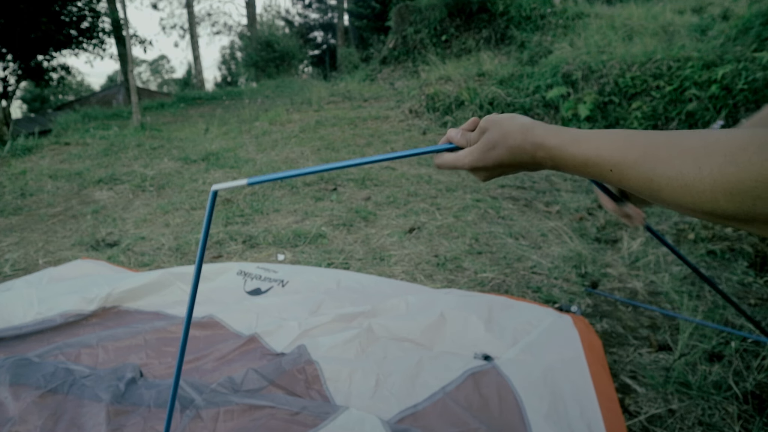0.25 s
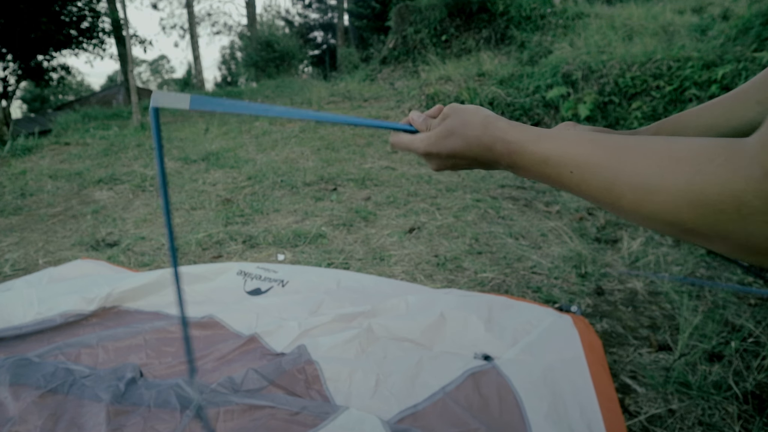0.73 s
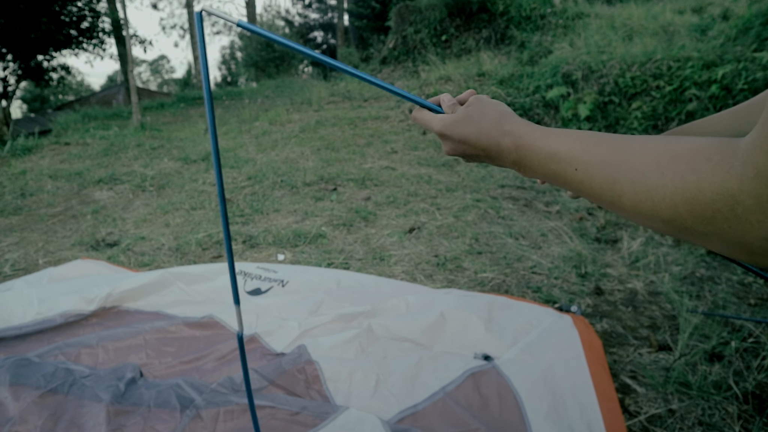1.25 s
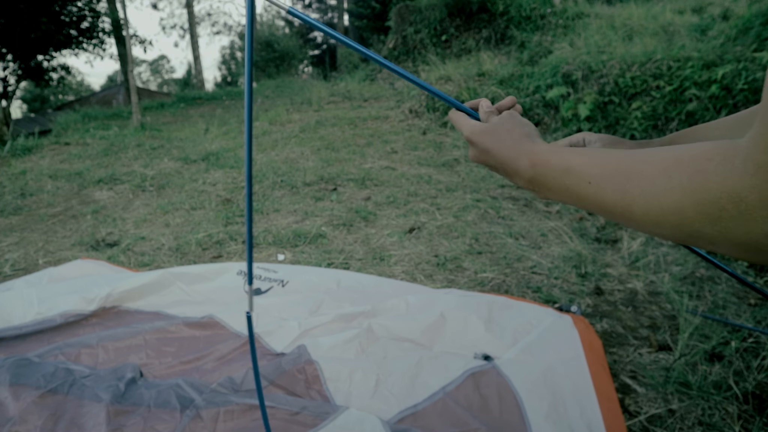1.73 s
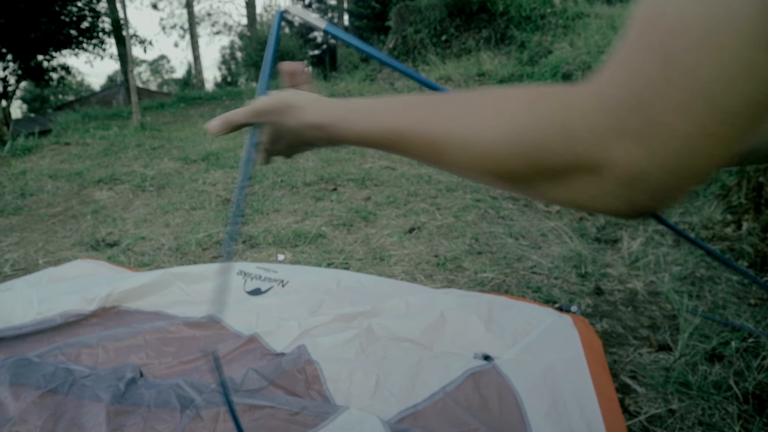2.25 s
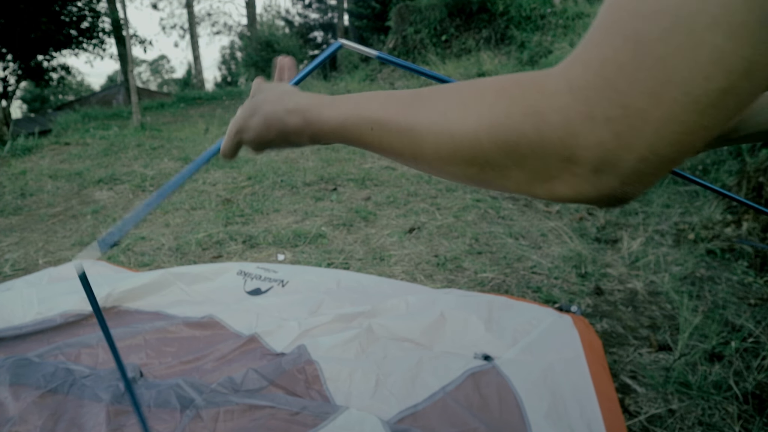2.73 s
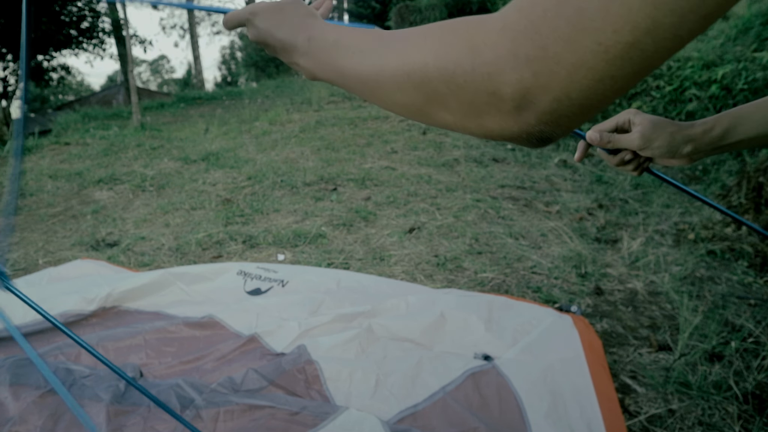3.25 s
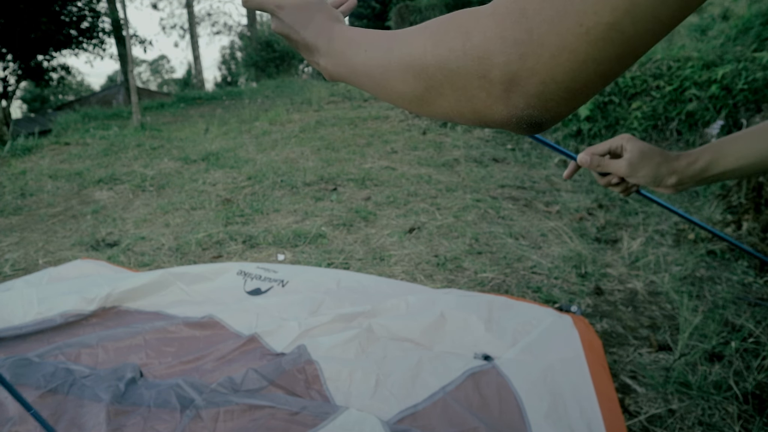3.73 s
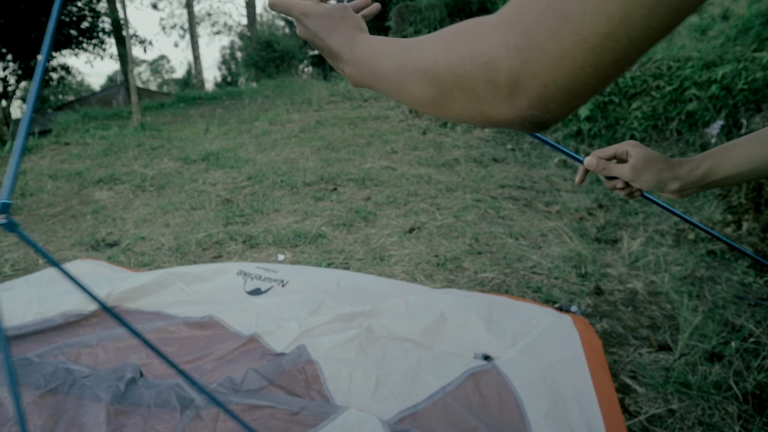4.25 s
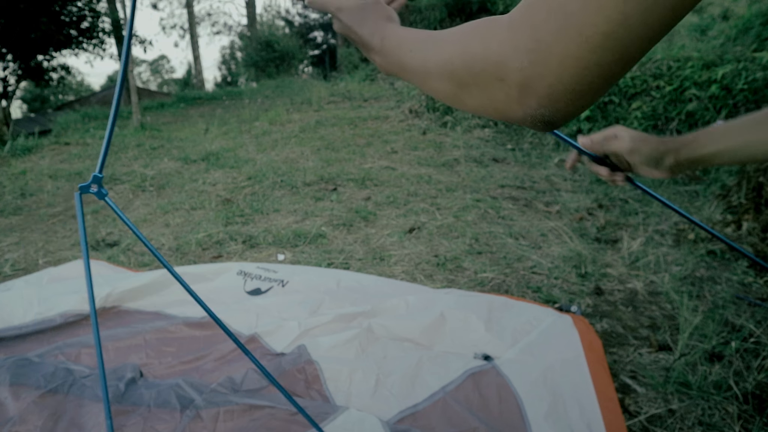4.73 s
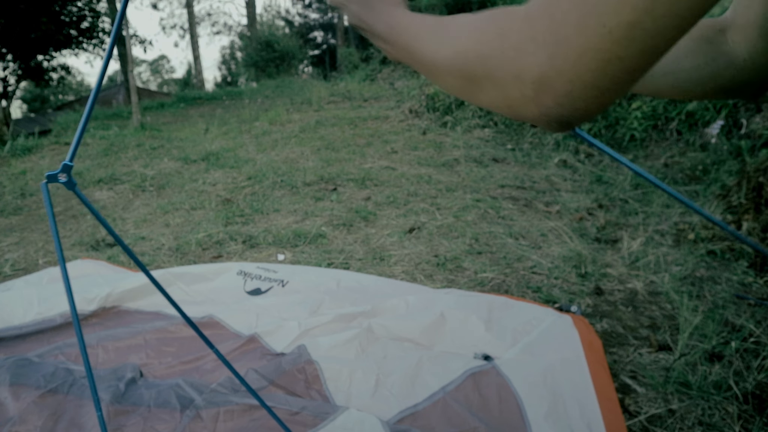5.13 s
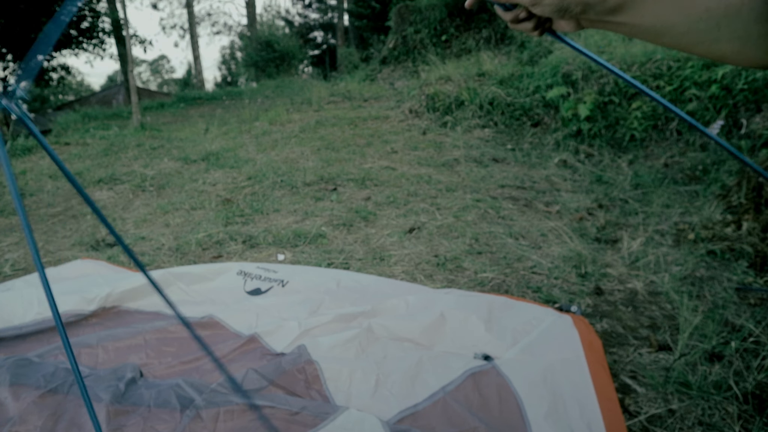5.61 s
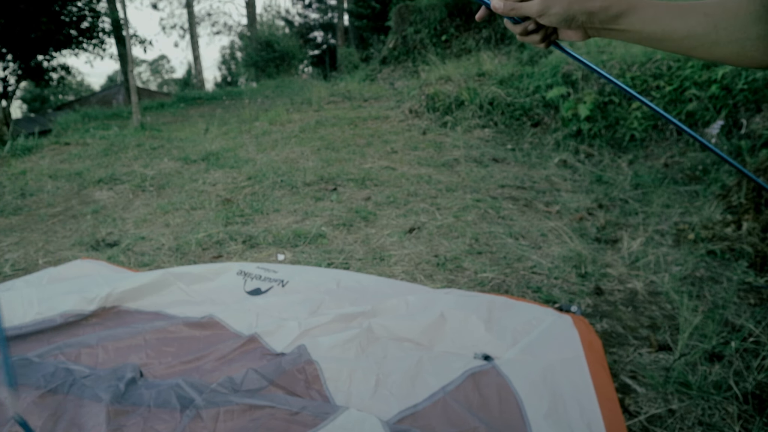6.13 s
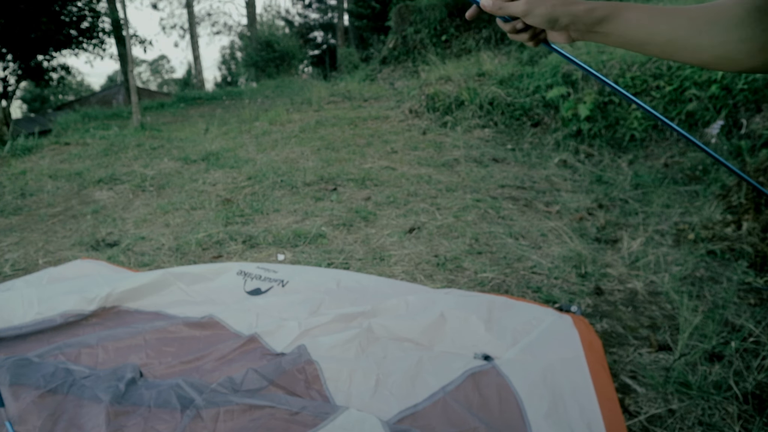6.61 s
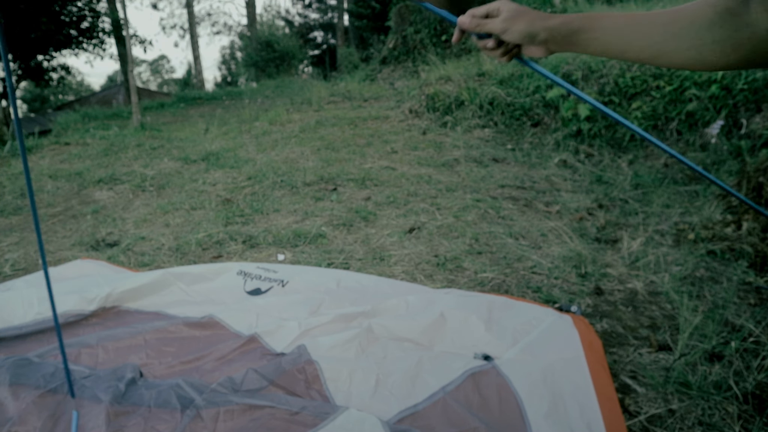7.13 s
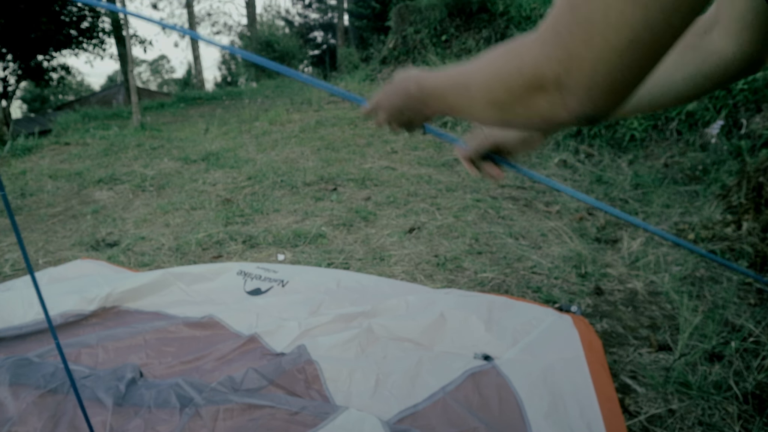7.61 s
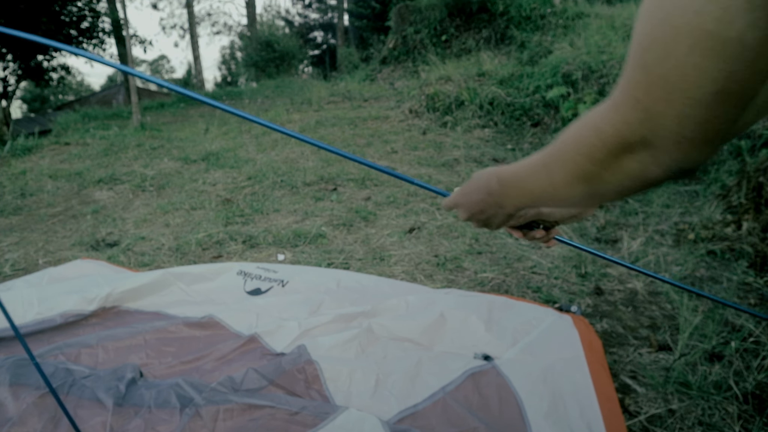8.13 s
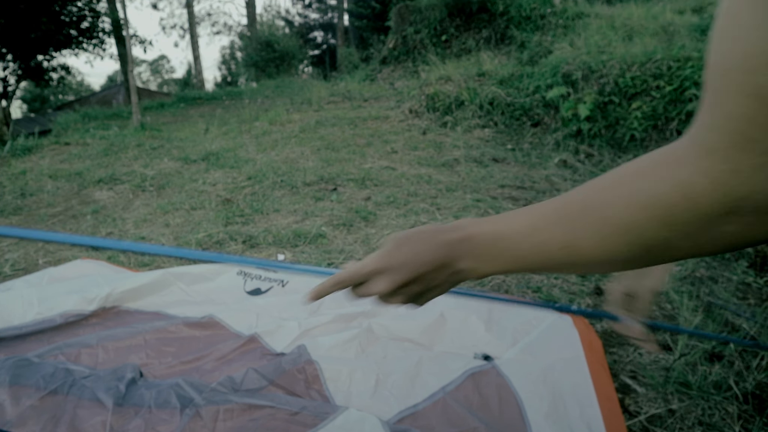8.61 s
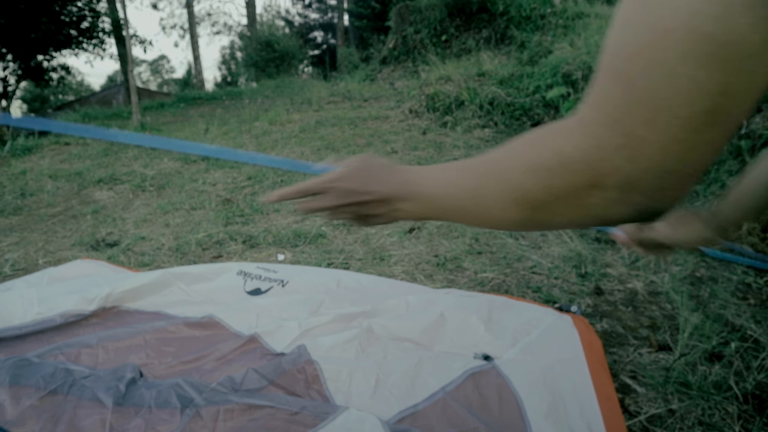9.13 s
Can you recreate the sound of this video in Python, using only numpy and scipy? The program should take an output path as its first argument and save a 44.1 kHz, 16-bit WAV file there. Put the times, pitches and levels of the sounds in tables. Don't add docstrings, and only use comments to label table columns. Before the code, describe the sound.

Outdoors on grass, close and dry, thin hollow metal poles are joined. A light clink and faint rub open at 0.1 s, small clinks at 0.8 and 1.2, then a hard bright snap at 1.8 with a short rasp before and after. A double snap falls at 2.3; from 2.7 to 3.6 clicks, scrapes and soft thuds crowd together, with a thin metallic singing slide fading toward 4.2. A firm clack at 4.6, then a lull. Ticks from 5.6 build to a sharp snap at 6.04 and low thuds, rustle and airy swishes until 6.7. The loudest snaps hit at 7.0 and 7.7, the latter a rapid double. Faint whooshes follow near 8 and 8.4, then drag and dull taps from 8.6 to 9.2. Throughout, quiet cicada buzz, leaf hush and distant engine drone; small two-note bird calls near 2 and 7, a blurred far call at 5.

```python
import sys
import numpy as np
from scipy import signal
from scipy.io import wavfile
from scipy.ndimage import uniform_filter1d

SR = 44100
rng = np.random.default_rng(int(sys.argv[2]) if len(sys.argv) > 2 else 0)


def log_audio(samples):
    frames = np.atleast_2d(samples).T
    limited = np.clip(frames, -1, 1)
    pcm = np.round(limited * 32767).astype(np.int16)
    wavfile.write(sys.argv[1], SR, pcm)


def amplitude_ratio(level_db):
    exponent = np.asarray(level_db, float) / 20
    return 10 ** exponent


N = 412776


def evened(x):
    return x / np.sqrt(np.mean(x ** 2) + 1e-20)


def faded(x, share):
    return x * signal.windows.tukey(len(x), share)


def read(points, hz):
    f, value = np.transpose(points)
    return np.interp(np.log(hz + 1), np.log(f + 1), value)


def add(mix, s, sound):
    part = mix[round(s * SR):][:len(sound)]
    part += sound[:len(part)]


def band(x, lo_hz, hi_hz, order=2):
    edges = [lo_hz, min(hi_hz, SR / 2 - 500)]
    return signal.lfilter(*signal.butter(order, edges, "band", fs=SR), x)


def wander(size, lo_hz, hi_hz):
    return evened(band(rng.standard_normal(size), lo_hz, hi_hz, order=1))


def resonate(x, hz, width):
    r = np.exp(-np.pi * width / SR)
    if np.ndim(hz) == 0:
        return 2 * signal.lfilter([1 - r], [1, -r * np.exp(2j * np.pi * hz / SR)], x).real
    turn = np.exp(2j * np.pi * np.cumsum(hz) / SR)
    return 2 * (turn * signal.lfilter([1 - r], [1, -r], x / turn)).real


def narrowed(x, hz, width):
    return evened(resonate(resonate(x, hz, width), hz, width))


def grit(size, per_s, spread_db):
    big = amplitude_ratio(spread_db * np.minimum(rng.exponential(1, size), 4))
    return evened(big * rng.standard_normal(size) * (rng.random(size) < per_s / SR))


def patchy(x, depth_db):
    z = signal.stft(x, nperseg=512, noverlap=384)[2]
    patches = uniform_filter1d(rng.standard_normal(z.shape), size=16, axis=1)
    patches = evened(uniform_filter1d(patches, size=4, axis=0))
    return signal.istft(z * amplitude_ratio(depth_db * patches), nperseg=512, noverlap=384)[1][:len(x)]


def tube(x, t60, scatter_db):
    # f/Hz, level/dB
    modes = [(2400, -7.5), (3300, -1.5), (4600, -12), (5150, -5), (5900, -1), (7300, 5.5), (8450, 7),
             (9450, 10), (10300, -25), (11100, -2.5), (12400, -2), (14600, -4)]
    out = 0
    for hz, db in modes:
        touch, detune = rng.standard_normal(2)
        out = out + amplitude_ratio(db + scatter_db * touch) * resonate(x, hz * (1 + 0.038 * detune), 2.86 / t60)
    return out


def wood():
    # f/Hz, level per Hz/dB
    hush = [(24, -41.5), (40, 0.5), (159, 2), (790, 0.5), (1040, -5.5), (1480, -6.5), (4340, -12),
            (4800, -12), (6170, -17.5), (7930, -5), (10200, -15), (14800, -14.5), (16000, -21)]
    # f/Hz, likeness/1
    coherence = [(60, 1), (180, 0.74), (550, 0.64), (1650, 0.67), (4970, 0.89), (8000, 1), (15000, 0.35)]
    frames, hz = N // 256 + 5, np.fft.rfftfreq(1024, 1 / SR)
    a, b, c, d, patches = rng.standard_normal((frames, 513, 5), dtype=np.float32).T
    patches = uniform_filter1d(patches, size=10, axis=0)
    patches = evened(uniform_filter1d(patches, size=14, axis=1))
    same = np.clip(read(coherence, hz), -1, 1)[:, None]
    left = a + 1j * b
    right = same * left + np.sqrt(1 - same ** 2) * (c + 1j * d)
    z = np.array([left, right]) * amplitude_ratio(read(hush, hz)[:, None] + 1.2 * patches)
    return amplitude_ratio(-60.5) * evened(signal.istft(z, nperseg=1024, noverlap=768)[1][:, :N])


def hum():
    # start t/s, end t/s, f/Hz
    steady_tone = (7.95, 8.58, 555)
    # f/Hz, width/Hz, level/dB
    drones = [(85, 25.3, -81), (148, 37, -76), (277, 11, -81.5)]
    out, (start, end, tone_hz) = np.zeros(N), steady_tone
    t = np.arange(0, end - start, 1 / SR)
    add(out, start, amplitude_ratio(-65.5) * faded(np.sin(2 * np.pi * tone_hz * t), .2))
    noise = rng.standard_normal(N)
    for hz, width, db in drones:
        out = out + amplitude_ratio(db) * narrowed(noise, hz, width)
    return out


def cicadas():
    # f/Hz, width/Hz, level/dB
    steady = (7650, 650, -66.5)
    # t/s, length/s, f/Hz, level/dB
    phrases = [
        (0, 0.78, 8150, -71),
        (.3, 0.73, 7140, -69),
        (1.45, 0.75, 7180, -66),
        (2.1, 0.5, 8060, -73),
        (3.9, .65, 8000, -78),
        (7.85, 0.77, 6960, -71),
        (8.3, 0.56, 8300, -70),
    ]
    turns = np.cumsum(103 + 5 * wander(N, .3, 2)) / SR
    beats = (.15 + np.exp(-(turns % 1) / 0.35)) * rng.standard_normal(N)
    steady_hz, width, steady_db = steady
    swell_db = 1.5 * wander(N, .3, 1.5)
    out = amplitude_ratio(steady_db + swell_db) * narrowed(beats[::-1], steady_hz, 1.5 * width)
    for start, length, hz, db in phrases:
        part = beats[round(start * SR):][:round(length * SR)]
        add(out, start, amplitude_ratio(db) * faded(narrowed(part, hz, width), .3))
    lower_kind = narrowed(rng.standard_normal(N), 4900, 300)
    return out + amplitude_ratio(-75.5) * lower_kind


def bird():
    # t/s, f/Hz, level/dB
    contour = [(0, 3300, -10), (.005, 3280, 8), (.015, 3370, 9), (.026, 3880, 12), (.04, 3320, 8),
               (.047, 3280, -25), (.056, 3250, 8), (.074, 3120, 11), (.098, 2750, -4)]
    # t/s, pitch factor/1, level/dB
    calls = [
        (1.812, 0.98, -68.5),
        (2.115, 0.95, -65.5),
        (6.752, 0.98, -65.5),
        (7.065, 1.0, -62.5),
    ]
    out, (s, hz, db) = np.zeros(N), np.transpose(contour)
    t = np.arange(0, s[-1], 1 / SR)
    for start, factor, call_db in calls:
        phase = 2 * np.pi * np.cumsum(factor * np.interp(t, s, hz)) / SR
        add(out, start, amplitude_ratio(call_db + np.interp(t, s, db)) * np.sin(phase))
    tail_t60 = 1.2
    tail = rng.standard_normal(SR // 2) * amplitude_ratio(-60 * np.arange(SR // 2) / SR / tail_t60)
    return out + amplitude_ratio(-1.) * signal.oaconvolve(out, tail / np.linalg.norm(tail))[:N]


def far_bird():
    # t/s, length/s, first f/Hz, last f/Hz, level/dB
    far_call = (5, .33, 3600, 3100, -59)
    out, (start, length, first_hz, last_hz, db) = np.zeros(N), far_call
    hz = np.linspace(first_hz, last_hz, round(length * SR))
    blur = narrowed(rng.standard_normal(len(hz)), hz, 450)
    add(out, start, amplitude_ratio(db - np.linspace(2., 14., len(hz))) * faded(blur, .3))
    return out


def whistle(hz, db, fuzz):
    air = rng.standard_normal((2, len(hz)))
    arch = np.sin(np.linspace(0, np.pi, len(hz)))
    pure = np.sin(2 * np.pi * np.cumsum(hz) / SR)
    tone = fuzz * narrowed(air[0], hz, 90) + (1.5 - fuzz) * pure
    fill = evened(resonate(resonate(air[1], hz * 0.79, 600), hz * 1.25, 640))
    return amplitude_ratio(db - 10 * (1 - arch)) * faded(tone + (.2 + .28 * fuzz) * fill, .3)


def swings():
    # t/s, length/s, first f/Hz, last f/Hz, level/dB
    glides = [(3.09, .13, 1700, 1150, -52), (2.99, .085, 2130, 1970, -50), (2.66, .06, 2250, 2150, -62),
              (5.93, .09, 1153, 1600, -53), (6.44, .175, 2760, 2130, -53), (6.625, .045, 1400, 700, -48),
              (6.61, .02, 2100, 1400, -50), (6.66, .08, 1620, 1180, -50), (6.73, .05, 1240, 500, -52),
              (6.135, .045, 960, 930, -49), (6.385, .04, 1120, 950, -50), (7.61, .06, 814, 1500, -55),
              (7.55, .05, 1250, 1250, -54), (5.84, .045, 950, 1500, -54), (5.96, .05, 2150, 2250, -56),
              (6.345, .04, 3800, 3150, -56), (6.49, .03, 2050, 1850, -52), (6.0, .045, 900, 950, -55),
              (7.755, .09, 1400, 500, -55.5)]
    # t/s, length/s, tip f/Hz at full speed, lateness of full speed/1, level/dB
    arcs = [
        (7.914, .175, 1500, 1.0, -49.5),
        (8.303, .2, 1678, 1.6, -53.5),
    ]
    # share of tip speed/1, level/dB, fuzz (0-2)/1
    strands = [
        (.48, 0, .55),
        (.7, -9, 1.3),
        (.84, -13, 1.3),
        (1.0, -7, .7),
    ]
    out = np.zeros(N)
    for start, length, first_hz, last_hz, db in glides:
        add(out, start, whistle(np.linspace(first_hz, last_hz, round(length * SR)), db, .55))
    for start, length, tip_hz, late, db in arcs:
        progress = np.linspace(0, 1, round(length * SR))
        speed = .5 + .5 * np.sin(np.pi * progress ** late)
        for share, part_db, fuzz in strands:
            add(out, start, whistle(share * tip_hz * speed, db + part_db, fuzz))
    return out


def handling():
    # t/s, level/dB
    rubbing = [(0, -65.5), (.12, -55), (.91, -66.5), (2.24, -65), (2.45, -57), (3.02, -46.5), (3.42, -56.5),
               (3.62, -48), (4.3, -58.5), (5.6, -66), (5.89, -52), (6.47, -51), (6.96, -61.5), (7.38, -67),
               (7.59, -55), (7.8, -69.5), (8.52, -65.5), (8.62, -60)]
    # t/s, level/dB
    dragging = [(.2, -60.5), (.91, -67), (2.2, -72.5), (2.4, -60.5), (2.75, -57), (3.02, -48),
                (3.44, -56.5), (4.9, -64), (5.72, -65.5), (5.85, -55), (6.5, -53), (6.93, -61.5),
                (7.38, -64), (7.59, -51.5), (7.82, -65.5), (8.52, -66), (8.62, -51), (8.72, -58)]
    t = np.arange(N) / SR
    metal_db = np.interp(t, *np.transpose(rubbing))
    drag_db = np.interp(t, *np.transpose(dragging))
    treble_db = -65.5 + 1 * (metal_db + 55.5)
    hollow_hz = 1014 + 3.5 * (drag_db + 69.0) + 150 * wander(N, 0.52, 1.8)

    jerky_hands = amplitude_ratio(1.5 * wander(N, 6, 40))
    rub = patchy(grit(N, 9000, 1.7) * jerky_hands, 2.8)
    metal = amplitude_ratio(metal_db) * evened(band(rub, 1900, 8600))
    metal = metal + amplitude_ratio(treble_db) * evened(band(rub, 8100, 14900, order=1))

    clumps = amplitude_ratio(0.75 * wander(N, 12, 60))
    drag = grit(N, 4000, 2.0) * clumps
    drag = patchy(band(drag + 0.63 * resonate(drag, hollow_hz, 313), 533, 1430), 3.1)
    crackle = band(grit(N, 250, 2.5), 570, 4100)
    return metal + amplitude_ratio(drag_db) * (evened(drag) + amplitude_ratio(-12) * evened(crackle))


def slides():
    # soft end t/s, loud end t/s
    spans = [(1.7, 1.77), (2.29, 2.325), (2.365, 2.335), (5.4, 5.42), (5.45, 5.42), (5.61, 5.645),
             (7.535, 7.5), (7.495, 7.474), (6.59, 6.618), (6.97, 7.012), (7.67, 7.69), (7.09, 7.02),
             (8.74, 8.58), (4.675, 4.65), (3.335, 3.27), (6.6, 6.56), (.22, .1), (1.85, 1.78), (4.55, 4.6),
             (3.8, 3.6)]
    levels = [-35, -40, -53, -41, -39.5, -41.5, -41, -34, -34, -37, -37, -37, -54, -44, -36, -45.5, -54,
              -60, -54, -46.5]
    out = np.zeros(N)
    for (soft, loud), db in zip(spans, levels):
        slips = grit(round(abs(loud - soft) * SR), 12000, 1.5)
        rasp = evened(evened(tube(slips, 0.012, 7.0)) + 1.3 * evened(band(slips, 2540, 8500)))
        swell_db = np.linspace(-20., 0, len(rasp))
        if loud < soft:
            swell_db = swell_db[::-1]
        add(out, min(soft, loud), amplitude_ratio(db + swell_db) * rasp)
    return out


def singing():
    # start t/s, end t/s, f/Hz
    tones = [(.1, .21, 5750), (.17, .21, 9450), (3.59, 3.86, 12450), (3.59, 3.7, 14600), (3.59, 3.78, 7450),
             (3.62, 3.9, 9520), (3.6, 3.72, 3250), (3.6, 3.75, 5200), (3.6, 3.8, 5970), (3.87, 3.99, 4600),
             (3.93, 4.13, 5800), (4.72, 4.79, 7320), (1.735, 1.77, 9500), (6.17, 6.21, 2780),
             (3.99, 4.11, 4300), (6.33, 6.38, 3600), (6.48, 6.52, 2000), (5.94, 6.01, 2200),
             (2.45, 2.58, 3400), (3.79, 3.92, 3300), (7.72, 7.76, 6100), (7.735, 7.76, 3050),
             (7.87, 7.98, 3300), (8.58, 8.63, 3200), (8.97, 9.2, 3200), (4.1, 4.3, 2900),
             (6.21, 6.25, 3850), (6.38, 6.47, 3800), (2.49, 2.59, 5300), (3.27, 3.29, 12500),
             (6.565, 6.6, 10600), (5.827, 5.85, 9500)]
    levels = [-58.5, -61, -51, -64, -50, -54, -58, -58, -55, -55, -54, -58, -57, -56, -55, -57, -54, -61,
              -60, -60, -56, -61, -72, -56, -67, -60, -54, -57, -57, -40, -56, -49]
    out = np.zeros(N)
    for (start, end, hz), db in zip(tones, levels):
        slips = grit(round((end - start) * SR), 2000, 0.94)
        slips = slips * amplitude_ratio(2.8 * wander(len(slips), 12, 50))
        sag = np.linspace(1.006, .988, len(slips))
        tone = evened(resonate(slips, hz * sag, 50 + 0.007 * hz))
        decay_db = np.linspace(4., -7., len(slips))
        add(out, start, amplitude_ratio(db + decay_db) * faded(tone, .5))
    return out


def taps():
    # t/s, peak level/dB, f/Hz
    thuds = [(.335, -47, 1000), (.424, -47, 1600), (2.495, -47, 860), (2.573, -45, 1000),
             (2.631, -43, 1200), (2.688, -47, 1310), (2.733, -38.5, 845), (2.771, -42, 1070),
             (2.819, -45, 910), (2.878, -34, 900), (2.994, -35, 1040), (3.117, -39.5, 1060),
             (3.183, -38, 1030), (3.341, -41, 1020), (3.375, -36, 1210), (3.908, -44, 740),
             (3.936, -41, 885), (4.6, -43, 1040), (4.149, -42, 640), (4.233, -44.5, 930),
             (4.666, -42, 1040), (4.689, -37, 1000), (4.701, -40, 1000), (5.802, -38, 1360),
             (5.812, -33.5, 1310), (5.9, -42, 900), (5.926, -38, 1000), (5.955, -38, 860),
             (6.068, -38, 1300), (6.089, -44, 1240), (6.134, -32.5, 870), (6.145, -35, 950),
             (6.193, -38, 850), (6.208, -42, 900), (6.281, -44, 890), (6.31, -33, 900), (6.34, -29.5, 900),
             (6.363, -36, 820), (6.392, -31.5, 1030), (6.41, -31, 970), (6.548, -45, 880),
             (6.591, -41, 890), (6.694, -39, 800), (6.71, -39, 1000), (6.742, -44, 1100), (7.38, -46, 805),
             (7.416, -42.5, 820), (7.449, -38.5, 1260), (7.487, -38, 1100), (7.54, -38, 860),
             (8.589, -39, 640), (8.646, -42, 990), (8.789, -40, 1010), (8.926, -50, 1040),
             (9.028, -35.5, 1160), (9.036, -42, 1100), (9.056, -46, 680), (9.226, -40.5, 1050),
             (9.237, -43, 1400)]
    out, t = np.zeros(N), np.arange(1800) / SR
    for s, peak_db, hz in thuds:
        blows = grit(len(t), 1500, 2.2) * amplitude_ratio(-60 * t / .035)
        blows[0] = 3.5
        tap = resonate(resonate(blows, hz, 230), hz, 1300) + 0.18 * band(blows, 380, 3450)
        add(out, s, amplitude_ratio(peak_db) * tap / abs(tap).max())
    return out


def bends():
    # t/s, peak level/dB
    blows = [
        (1.208, -38),
        (6.043, -38),
        (7.022, -38),
        (7.481, -37),
    ]
    out, t = np.zeros(N), np.arange(6000) / SR
    for s, peak_db in blows:
        swell = np.minimum(t / 0.014, 1)
        add(out, s, amplitude_ratio(peak_db - 60 * t / 0.061) * np.sin(2 * np.pi * 282 * t) * swell)
    return out


def echoes(x):
    t, t60 = np.arange(6000) / SR, 0.13
    tail = rng.standard_normal((2, len(t))) * amplitude_ratio(-60 * t / t60) * np.minimum(t / 0.0053, 1)
    tail = tail / np.linalg.norm(tail[0])
    return amplitude_ratio(-43) * signal.oaconvolve(x[None], tail, axes=1)[:, :N]


def click(peak_db, low_hz, high_hz, treble_db):
    t = np.arange(1700) / SR
    knock_db = -25 - 0.37 * (peak_db + 24.0)
    snap_t60 = np.clip(.014 - 0.00078 * peak_db, .008, .028)
    chatter = amplitude_ratio(-60 * t / snap_t60) + amplitude_ratio(-21 - 60 * t / 0.055)
    blows = grit(len(t), 6000, 1.26) * chatter * np.minimum(t / 0.00058, 1)
    blows[16] += 5.5
    ring = tube(blows, .006, 1.0)
    ring = ring + 2.7 * resonate(blows, low_hz, 490) + 3.6 * resonate(blows, high_hz, 410)
    top = band(ring, 8000, 14250, order=3) * amplitude_ratio(-60 * t / 0.11)
    knock = resonate(blows, 910, 550) + 0.57 * resonate(blows, 1140, 500)
    knock = band(knock, 230, 3400, order=1)
    out = evened(band(ring, 0.53 * low_hz, 8480, order=3))
    out = out + amplitude_ratio(treble_db + 9.0) * evened(top) + amplitude_ratio(knock_db + 9) * evened(knock)
    return amplitude_ratio(peak_db) * out / abs(out).max()


def clicks():
    # t/s, peak level/dB, lower ring f/Hz, upper ring f/Hz, treble level/dB
    snaps = [(1.7697, -2.5, 3740, 7150, -12.5), (2.2938, -16.5, 4400, 9400, -3),
             (2.3255, -6.5, 5400, 7400, -10.5), (2.334, -10, 3970, 7560, -11),
             (2.914, -8.5, 5400, 7300, -16.5), (3.2695, -9.5, 5500, 6900, -9),
             (3.301, -21, 4600, 6150, -28), (3.3175, -16, 4460, 7600, -15), (3.44, -18, 4580, 5500, -17.5),
             (3.5468, -14.5, 4170, 6000, -9), (3.583, -19, 5500, 7600, -11),
             (4.6054, -6, 3360, 4300, -16.5), (4.687, -20, 5140, 5760, -15.5),
             (5.8602, -17, 5400, 7540, -12), (6.04, -5, 6060, 8900, -6.5),
             (6.616, -12.5, 2870, 4770, -12.5), (7.0117, -0.5, 4300, 5900, -10),
             (7.4756, -18, 4340, 5050, -27), (7.689, -4.5, 3300, 5260, -25)]
    # t/s, peak level/dB, lower ring f/Hz, upper ring f/Hz, treble level/dB
    clinks = [(0.1, -28, 4170, 7600, -17), (0.7884, -26, 2470, 5700, -8.5), (0.843, -30.5, 4630, 5750, -10),
              (1.2083, -22.5, 2720, 6450, -10.5), (2.2794, -27.5, 4160, 7360, -11),
              (2.4331, -24.5, 4400, 5240, -17), (2.463, -30.5, 3500, 5840, -18),
              (2.7781, -21.5, 4850, 6340, -13), (2.9898, -27, 3800, 7000, -24),
              (3.0062, -22.5, 3270, 5250, -15), (3.0567, -25.5, 2920, 5300, -18),
              (3.2856, -20, 4400, 7900, -8), (3.506, -19, 3700, 6400, -11), (3.518, -24.5, 3970, 5700, -18),
              (4.572, -20.5, 5030, 7400, -11), (4.674, -21.5, 5300, 7250, -12),
              (4.698, -24, 5030, 7450, -17), (5.4196, -25.5, 5370, 7540, -38),
              (5.7677, -28.5, 5020, 7350, -2), (5.785, -30, 4500, 9400, -4), (5.7925, -29, 6000, 9500, -8),
              (5.812, -25, 4840, 8600, -11), (5.8275, -21.5, 5300, 9400, -6), (5.839, -28, 5300, 7500, -12),
              (5.983, -23, 3500, 8500, -10.5)]
    # t/s, peak level/dB, lower ring f/Hz, upper ring f/Hz
    rebounds = [(1.771, -6, 3720, 7140), (1.774, -28, 4430, 7230), (2.3207, -15, 5400, 9500),
                (4.6088, -16.5, 3600, 8700), (5.865, -27, 5800, 8600), (6.042, -8.5, 5500, 7000),
                (7.0141, -1, 4600, 7100), (7.0167, -4.5, 3830, 8950), (7.0205, -11.5, 3600, 6060),
                (7.6909, 0, 5600, 5830), (7.6918, 0.5, 5950, 8800), (7.6952, -4, 5700, 8700),
                (7.6968, -9, 7100, 12000), (7.706, -32, 3100, 4800)]
    # t/s, peak level/dB, ring f/Hz
    ticks = [(.1188, -33, 7260), (.2887, -40.5, 5850), (.3177, -37.5, 5240), (.3755, -38, 5600),
             (.476, -46, 4000), (.502, -46, 3500), (2.311, -34, 5500), (2.4059, -42, 4000),
             (2.7072, -31, 4500), (2.7635, -35, 4000), (2.834, -31, 5540), (2.841, -32, 5700),
             (3.0959, -36, 4420), (3.2054, -32, 2730), (3.345, -40, 3400), (3.356, -41, 5500),
             (4.206, -38.5, 2830), (4.364, -31.5, 5460), (4.371, -38, 5700), (4.415, -48, 3000),
             (4.7164, -38, 7390), (4.7316, -36, 7250), (4.7526, -44, 7230), (4.846, -47, 3330),
             (5.618, -38, 4470), (5.628, -35, 5300), (5.637, -37, 7540), (5.6425, -27.5, 7470),
             (5.6685, -34, 7300), (5.695, -31.5, 7300), (5.847, -27, 7550), (5.8793, -25, 5930),
             (6.0673, -36, 8400), (6.1142, -43, 3750), (6.1272, -38, 5160), (6.134, -34, 3000),
             (6.192, -37.5, 3600), (6.2329, -37, 3800), (6.2728, -38, 3600), (6.2773, -34, 4700),
             (6.3107, -42, 4380), (6.3402, -35, 3670), (6.3906, -40, 3800), (6.4943, -42, 3280),
             (6.5073, -32, 4810), (6.5627, -35, 7850), (6.774, -40, 4100), (6.9042, -44, 3230),
             (7.291, -49, 4200), (7.449, -43, 5070), (7.505, -29, 4800), (7.6136, -38.5, 2900),
             (8.79, -46, 5200), (8.895, -51, 3000)]
    out = np.zeros(N)
    for s, *blow in snaps + clinks:
        add(out, s, click(*blow))
    for s, peak_db, low_hz, high_hz in rebounds:
        add(out, s, click(peak_db, low_hz, high_hz, -12.5))
    for s, peak_db, hz in ticks:
        add(out, s, click(peak_db, hz, hz, -20.5))
    return out + echoes(out) + bends()


def scene():
    rest = wood() + hum() + cicadas() + bird() + far_bird()
    rest = rest + swings() + handling() + slides() + singing()
    rest = signal.sosfilt(signal.butter(10, 15900, fs=SR, output="sos"), rest)
    return rest + taps() + clicks()


def top_cut(x):
    return signal.sosfilt(signal.butter(12, 17010, fs=SR, output="sos"), x)


def record(dry):
    mix = np.clip(dry, -1, 1)
    mix = signal.sosfilt(signal.butter(3, 62, "high", fs=SR, output="sos"), mix)
    mix = signal.sosfilt(signal.butter(12, 16600, fs=SR, output="sos"), mix)
    return top_cut(mix)


dry = scene()
out = record(dry)
log_audio(out)
```